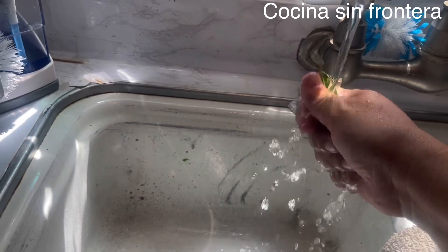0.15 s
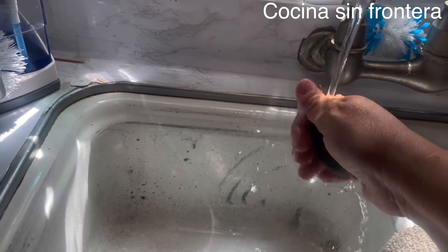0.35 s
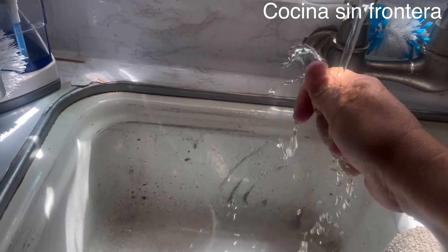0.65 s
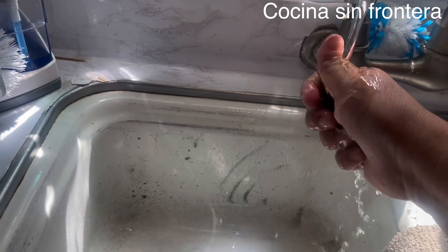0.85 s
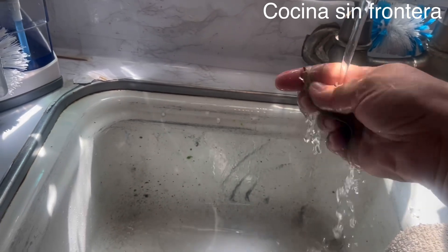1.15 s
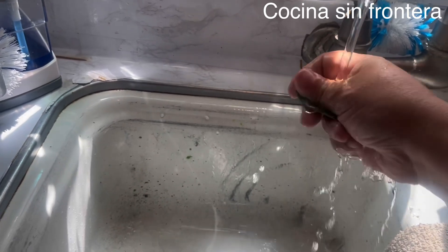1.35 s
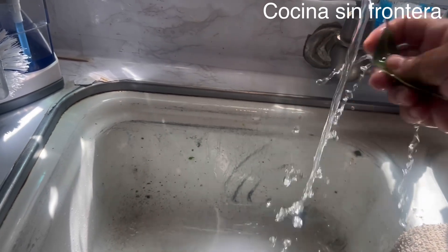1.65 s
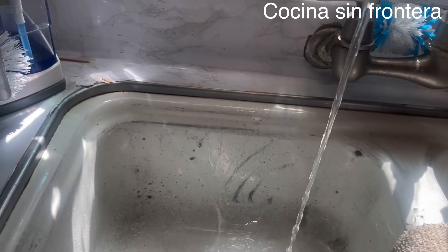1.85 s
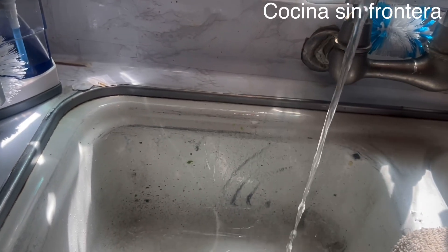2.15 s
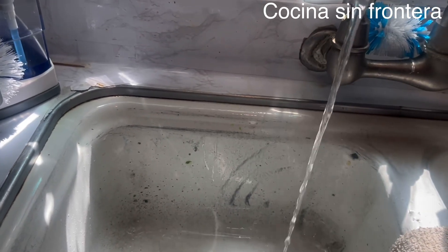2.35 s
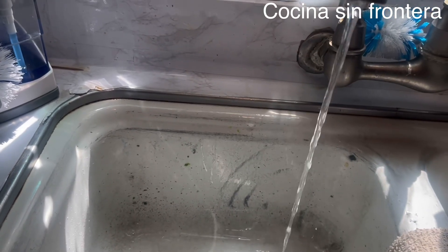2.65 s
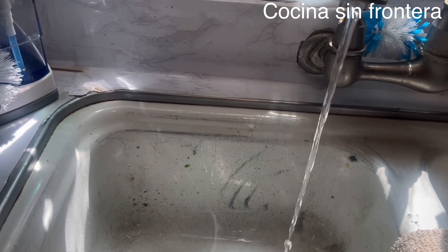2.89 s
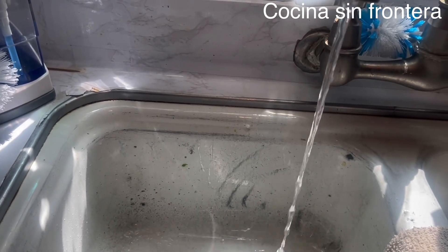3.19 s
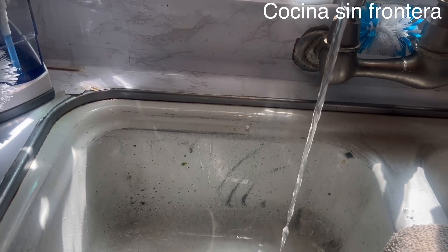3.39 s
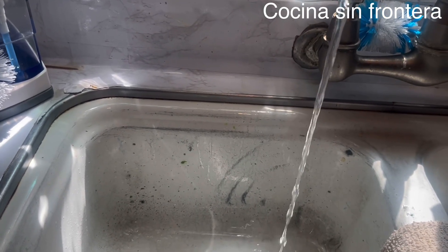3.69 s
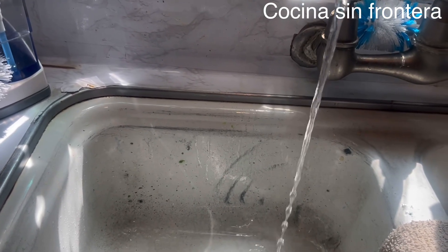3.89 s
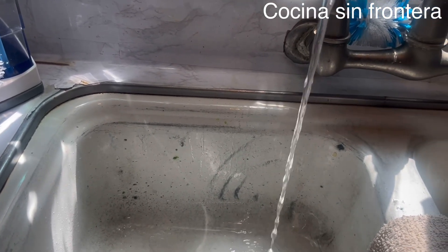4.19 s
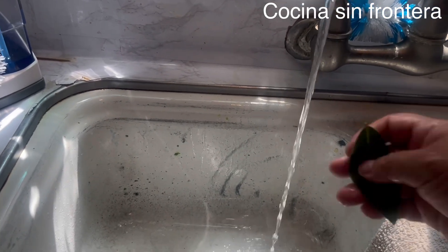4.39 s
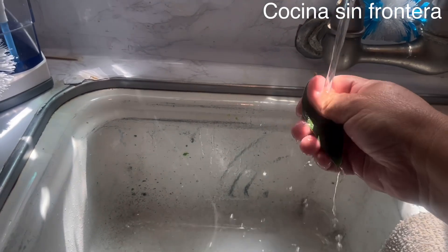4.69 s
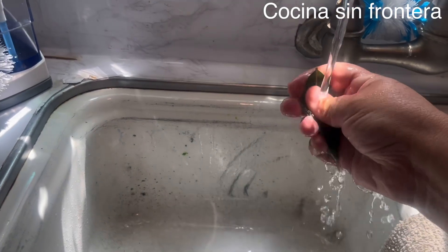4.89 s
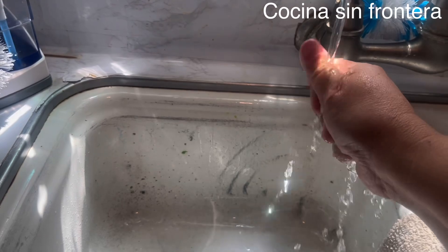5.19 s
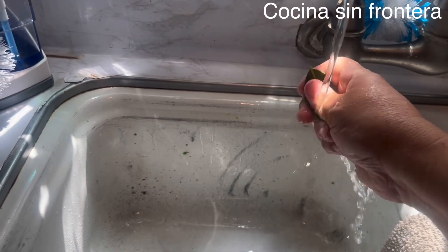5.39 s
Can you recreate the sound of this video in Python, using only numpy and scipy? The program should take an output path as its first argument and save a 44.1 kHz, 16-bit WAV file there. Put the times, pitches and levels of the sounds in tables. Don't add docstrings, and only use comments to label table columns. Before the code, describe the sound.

A kitchen tap runs into a steel sink, heard close in stereo with a short, tight echo from the basin sides. From 0 to 1.7 s a hand rinsing leaves breaks up the stream: fine spray hiss and trickling, a rounded low bloop at the very start, and irregular bright drips with quickly rising bubble chirps, clustered around 0.3-0.8 and 1.1-1.3 s. At about 1.75 s the hand leaves and the water lands in a dense splashing surge until 2 s. The free stream then drums unevenly on the thin metal, with dull slaps, crackling foam, sharp ticks and wet plops; heavier splats stand out near 2.2, 2.6, 3.0, 3.5 and 3.9 s, with a hollow bloop around 2.9 s. At 4.6 s the hand returns and the drumming drops away, leaving soft trickle, hiss and sparse drips near 5.3 s until 5.5 s. Low air rumble and a faint wavering motor hum persist underneath.

```python
import sys
import numpy as np
from scipy import signal
from scipy.fft import rfft, irfft, next_fast_len
from scipy.io import wavfile
from scipy.ndimage import uniform_filter1d

SR = 44100
rng = np.random.default_rng(int(sys.argv[2]) if len(sys.argv) > 2 else 0)


def generate_wav(sig):
    pcm = np.round(np.clip(np.atleast_2d(sig).T, -1, 1) * 32767).astype(np.int16)
    wavfile.write(sys.argv[1], SR, pcm)


def rack_gain(trim_db):
    fader = np.asarray(trim_db, float)
    return 10 ** (fader / 20)


N = 244314

# start_s [s], peak_db [dB]
LUMPS = [(0.026, -32), (.323, -38), (.61, -45), (.797, -33.5), (1.119, -39), (1.788, -30), (2.023, -37),
         (2.102, -37), (2.256, -38), (2.311, -29.5), (2.518, -30), (2.59, -30.5), (2.626, -27.5),
         (2.713, -32), (2.741, -36), (2.808, -27), (2.995, -34), (3.286, -60), (3.443, -44), (3.47, -38),
         (3.57, -32), (3.6, -26.5), (3.652, -30), (3.832, -23.5), (3.908, -29), (4.096, -28.5),
         (4.288, -27), (4.396, -25.5), (4.509, -32), (4.546, -23.5)]


def rms_one(x):
    return x / np.sqrt(np.mean(x ** 2) + 1e-20)


def in_time(points):
    return np.interp(np.arange(N) / SR, *np.transpose(points))


def at_hz(points, hz):
    point_hz, value = np.transpose(points)
    return np.interp(np.log(hz + 1), np.log(point_hz + 1), value)


def filtered(x, response):
    size = next_fast_len(N + 4096)
    hz = np.arange(size // 2 + 1) * SR / size
    return irfft(rfft(x, size) * response(hz), size)[..., :N]


def band(x, low_hz, high_hz):
    sos = signal.butter(2, [low_hz, high_hz], "band", fs=SR, output="sos")
    return signal.sosfilt(sos, x + 1e-18)


def resonance(x, hz, width_hz):
    r = np.exp(-np.pi * width_hz / SR)
    poles = [1, -2 * r * np.cos(2 * np.pi * hz / SR), r * r]
    return signal.lfilter([(1 - r * r) / 2, 0, (r * r - 1) / 2], poles, x + 1e-18)


def decaying(x, time_s):
    return signal.lfilter([1], [1, -np.exp(-1 / (time_s * SR))], x)


def drift(rate_hz):
    r = np.exp(-2 * np.pi * rate_hz / SR)
    return rms_one(signal.lfilter([1], [1, -2 * r, r * r], rng.standard_normal(N + SR))[SR:])


def uneven_sizes(spread_db):
    return rack_gain(spread_db * np.minimum(rng.exponential(1, (2, N)), 3))


def patter(per_s, spread_db, bed):
    struck = rng.random((2, N)) < per_s / SR
    impacts = uneven_sizes(spread_db) * rng.standard_normal((2, N)) * struck
    return rms_one(rms_one(impacts) + bed * rng.standard_normal((2, N)))


def lump_blows(extra_db):
    start_s, peak_db = np.transpose(LUMPS)
    blows = np.zeros((2, N))
    blows[:, np.round(start_s * SR).astype(int)] = rack_gain(peak_db + extra_db)
    return blows


def stream_free():
    hand_away_s, hand_back_s, half_s = 1.775, 4.61, 0.014
    return in_time([(hand_away_s - half_s, 0), (hand_away_s + half_s, 1),
                    (hand_back_s - half_s, 1), (hand_back_s + half_s, 0)])


def room():
    # pitch_hz [Hz], level_db [dB per Hz]
    rumble_spectrum = [(12, -65), (20, -16), (41, -11), (64, -1.5), (87, -6), (125, -5.5), (189, -16.5),
                       (223, -12), (243, -18.5), (462, -13), (544, -28), (700, -33.5), (910, -72),
                       (1540, -120)]
    # pitch_hz [Hz], level_db [dB rms], waver_hz [Hz]
    hum = [
        (59.24, -43, 0.81),
        (121.1, -50, 5.71),
    ]
    noise = rng.standard_normal((2, N))
    out = rack_gain(-41.5) * rms_one(filtered(noise, lambda hz: rack_gain(at_hz(rumble_spectrum, hz))))
    for pitch_hz, level_db, waver_hz in hum:
        phase = 2 * np.pi * np.cumsum(pitch_hz + waver_hz * drift(3.69)) / SR
        out[0] += np.sqrt(2) * rack_gain(level_db + 2.0 * drift(12.4)) * np.sin(phase)
    return out


def hiss(spectrum, level_db, grains, patchy_db):
    coloured = rms_one(filtered(grains, lambda hz: rack_gain(at_hz(spectrum, hz))))
    centres_hz = np.geomspace(spectrum[1][0], spectrum[-2][0], 5)
    together, out = drift(26), 0
    for only_this in np.eye(5):
        weights = list(zip(centres_hz, only_this))
        part = filtered(coloured, lambda hz: at_hz(weights, hz))
        out = out + rack_gain(patchy_db * (.5 * together + drift(11.2))) * part
    return rack_gain(level_db) * out


def spray(flow_db, free):
    spectrum = [(6500, -16), (8000, -13), (9500, 5.5), (11000, -3), (12700, 7), (14000, -0.5), (15800, 8),
                (16300, -30)]
    level_db = -45 + 0.44 * flow_db + 1.5 * free
    return hiss(spectrum, level_db, patter(430, spread_db=6.0, bed=2.9), patchy_db=2.5)


def trickle(flow_db):
    spectrum = [(600, -52), (900, 0.5), (1500, 4.5), (2000, -2), (2500, -14.5), (4300, 2.5), (5000, 4.5),
                (5600, -1), (6400, 6.5), (8000, -4), (9500, -39)]
    return hiss(spectrum, -50 + flow_db, patter(460, spread_db=7.0, bed=3.1), patchy_db=4.0)


def tiny_bubbles(per_s, cycles, spread_db, level_db):
    sizes = uneven_sizes(spread_db) * rng.choice([-1, 1], (2, N))
    born = rng.random((2, N)) < per_s / SR
    pitches_hz = np.geomspace(1500, 7320, 24)
    dealt = rng.integers(0, len(pitches_hz), (2, N))
    rings = 0
    for k, hz in enumerate(pitches_hz):
        width_hz = np.log(1000) * hz / np.pi / cycles
        rings = rings + resonance(sizes * born * (dealt == k), hz, width_hz)
    return rack_gain(level_db) * rms_one(rings)


def foam(flow_db):
    return tiny_bubbles(per_s=900, cycles=210, spread_db=4.0, level_db=-53 + flow_db)


def crackle(flow_db, free):
    return tiny_bubbles(per_s=120, cycles=25, spread_db=8.5, level_db=-59.5 + flow_db + 6 * free)


def walls(x):
    echo_bands = [
        (810, 2330, 0.08, -7),
        (2700, 3450, 0.085, -2.5),
        (4400, 5500, 0.055, -4),
        (5500, 11500, 0.048, -6.5),
        (7700, 22000, 0.05, -8),
    ]
    t, echo = np.arange(5000) / SR, 0
    noise = rng.standard_normal((2, len(t))) * (1 - np.exp(-t / 0.000068))
    for low_hz, high_hz, t60_s, level_db in echo_bands:
        echo = echo + band(noise, low_hz, high_hz) * rack_gain(level_db - 19.0 - 60 * t / t60_s)
    return signal.fftconvolve(x[None], echo, axes=1)[:, :N]


def slaps():
    fade = decaying(lump_blows(1.5), time_s=0.0068)
    return band(fade * rng.standard_normal((2, N)), 586, 1920)


def basin(free):
    # pitch_hz [Hz], width_hz [Hz], level_db [dB]
    modes = [(336.7, 16.8, 3), (468, 53, -4), (546, 41, 2.5), (675, 28, -7.5), (754, 26, -5.5),
             (903, 80, -9.5), (1171, 107, -9), (1590, 62, -17), (2000, 48, -12), (2755, 51, -19.5)]
    swell = 1 + decaying(lump_blows(30), time_s=0.016)
    drum_db = -51.5 + 10 * free
    force = rack_gain(drum_db + 1.0 * drift(30)) * swell * patter(260, spread_db=1.5, bed=.75)
    out = 0
    for k, (pitch_hz, width_hz, level_db) in enumerate(modes):
        blows = lump_blows(rng.normal(0, 0.81, (2, len(LUMPS))) - 32.0) * SR / width_hz
        sign = (-1) ** k
        out = out + sign * rack_gain(level_db) * resonance(rack_gain(17.0) * force + blows, pitch_hz, width_hz)
    return out


def bloops():
    large_bubbles = [(0.0275, -33, 2275, 0.067), (.028, -27.5, 1600, 0.033), (.028, -33.5, 3080, 0.02),
                     (.04, -54, 1980, 0.018), (.2, -48, 2450, .02), (.2, -51, 1500, .02),
                     (.285, -44.5, 2120, 0.037), (.284, -42, 3050, .02), (.5866, -50, 1590, 0.05),
                     (.6125, -40.5, 1380, 0.023), (.6135, -43.5, 2450, 0.035), (.613, -50, 3040, .02),
                     (.614, -46, 3600, .025), (.625, -42.5, 1590, 0.053), (.953, -49, 2070, 0.054),
                     (1.04, -44, 1600, 0.046), (1.337, -40.5, 1270, 0.013), (1.535, -45, 1590, 0.049),
                     (2.913, -31.5, 1176, 0.048), (4.866, -45, 1573, 0.096), (5.089, -55, 2280, .05)]
    out, t = np.zeros(N + SR), np.arange(5000) / SR
    for start_s, peak_db, pitch_hz, t60_s in large_bubbles:
        shape = (1 - np.exp(-t / 0.00044)) * rack_gain(peak_db + 9.5 - 60 * t / t60_s)
        out[round(start_s * SR):][:len(t)] += shape * np.sin(2 * np.pi * pitch_hz * (t + 0.72 * t * t))
    return out[:N] * (1 + .3 * drift(150))


def landings():
    # start_s [s], crack_db [dB], pitch_hz [Hz], bubble_db [dB]
    drips = [(.2452, -32, 3740, -32), (.326, -43, 1590, -48), (.338, -23.5, 5700, -22),
             (0.3595, -29, 5700, -24), (0.4093, -32, 4900, -23), (0.427, -49, 3400, -14.5),
             (0.4547, -45, 3700, -26), (0.519, -30, 6300, -20), (0.615, -40, 2430, -52),
             (0.6385, -30, 6220, -26), (0.7213, -32, 5800, -12.5), (0.7533, -19.5, 6580, -18.5),
             (0.791, -19, 6800, -33), (0.803, -18, 4950, -23), (1.066, -13, 5310, -10),
             (1.1107, -23.5, 2750, -32), (1.137, -20.5, 5350, -17.5), (1.1555, -29, 1753, -30.5),
             (1.177, -35, 2730, -29), (1.2, -29, 5830, -20), (1.2196, -35, 5840, -28),
             (1.25, -26, 5860, -19), (1.2674, -46, 4650, -13.5), (1.2919, -48, 1615, -39),
             (1.559, -18.5, 4670, -26), (1.5844, -32, 4450, -22.5), (1.6552, -47, 2450, -21.5),
             (1.6977, -35, 4930, -38), (5.278, -35, 4400, -15.5), (5.3362, -49, 2990, -19.5)]
    # start_s [s], crack_db [dB], pitch_hz [Hz], bubble_db [dB]
    surge = [(1.7503, -18, 2900, -23), (1.76, -15.5, 6400, -15), (1.77, -16, 2940, -15),
             (1.787, -24, 6260, -18), (1.7957, -24, 4440, -15), (1.811, -18, 2680, -22),
             (1.829, -17.5, 6700, -22), (1.9362, -17, 4550, -17), (1.96, -20, 6400, -16.5),
             (1.9815, -20, 4050, -20), (2.005, -22, 6300, -15), (2.0249, -9, 7250, -15)]
    # start_s [s], crack_db [dB], pitch_hz [Hz], bubble_db [dB]
    plops = [(2.1817, -18.5, 2660, -16), (2.254, -19, 4720, -9.5), (2.591, -14, 5230, -39),
             (2.6226, -9.5, 4230, -10.5), (2.667, -26, 4420, -21), (2.7181, -20, 4600, -11),
             (2.784, -36, 4600, -28.5), (2.8472, -18, 4870, -15), (2.888, -16, 6660, -19.5),
             (2.946, -15, 4600, -12.5), (3.009, -25, 4210, -15), (3.1585, -16, 4540, -14),
             (3.1728, -12, 7000, -6.5), (3.1888, -13.5, 4330, -15.5), (3.3476, -18.5, 4470, -11),
             (3.384, -18, 4300, -13), (3.469, -17, 2805, -19), (3.497, -28, 4260, -22),
             (3.741, -14.5, 8050, -22), (3.7978, -20, 4120, -20), (3.8812, -14, 4130, -40),
             (4.04, -26, 6200, -26.5), (4.0955, -13.5, 4350, -14.5), (4.1084, -16, 4800, -24),
             (4.203, -11.5, 6750, -11.5), (4.209, -42, 6440, -30), (4.2634, -23, 6700, -19.5),
             (4.397, -15, 4180, -12), (4.432, -17.5, 4900, -18.5), (4.5886, -20, 4400, -14)]
    # start_s [s], level_db [dB]
    splats = [(.0075, -25), (0.4102, -31), (0.4235, -26), (0.7225, -19), (0.7527, -25), (0.8043, -25),
              (1.066, -43), (1.2676, -23), (1.4515, -43), (1.657, -20.5), (1.7501, -19.5), (1.7967, -18.5),
              (1.8094, -17), (1.83, -24), (2.022, -31), (2.136, -25), (2.182, -11.5), (2.5922, -5.5),
              (2.6233, -16), (2.7197, -22), (3.0104, -11), (3.1596, -15.5), (3.47, -9), (3.675, -30),
              (3.7984, -26.5), (3.882, -10), (4.0954, -28), (4.3964, -21), (4.5423, -30.5), (5.3362, -15)]
    # start_s [s], crack_db [dB]
    flicks = [(.0075, -25), (.133, -33), (.2858, -33), (.3202, -33), (.6775, -18.5), (1.2326, -18),
              (1.3162, -12), (1.4258, -27), (1.6402, -26), (1.6915, -31), (1.7327, -27), (4.7482, -21.5),
              (5.2682, -27), (5.292, -27), (5.3097, -22.5)]
    # start_s [s], crack_db [dB]
    ticks = [(1.8902, -23.5), (1.9052, -24), (2.0464, -22), (2.067, -21), (2.098, -20), (2.2252, -22.5),
             (2.291, -20.5), (2.3021, -23), (2.312, -23), (2.3208, -27), (2.3713, -23), (2.4239, -19.5),
             (2.523, -15), (2.536, -22), (2.5725, -24), (2.7103, -25), (3.0739, -15.5), (3.1453, -17.5),
             (3.1678, -26), (3.2062, -24), (3.3315, -23), (3.6583, -28), (3.8274, -15.5), (3.8601, -27),
             (3.875, -22), (3.9455, -22.5), (4.2503, -23), (4.3129, -21), (4.369, -23), (4.4561, -18.5),
             (4.553, -21.5),
             (2.1608, -29), (2.461, -31), (2.808, -25), (2.827, -32), (2.874, -31), (2.998, -34),
            (3.417, -23.5), (3.568, -28), (3.906, -30), (4.381, -22), (4.482, -35), (4.5271, -32),
            (4.57, -25), (4.5775, -28)]
    # start_s [s], crack_db [dB]
    specks = np.array([(1.1435, -29), (1.222, -31), (1.847, -30), (2.335, -31), (2.381, -27), (2.418, -36),
                       (2.494, -32), (3.0135, -21), (3.8065, -31), (3.863, -30), (3.892, -35), (3.919, -31),
                       (3.936, -36), (4.209, -28)])
    # start_s [s], pitch_hz [Hz], level_db [dB]
    hollows = [
        (1.75, 2000, -31),
        (2.1816, 2220, -19),
        (3.0104, 2490, -27),
        (3.469, 2250, -33),
        (3.8818, 2160, -19),
    ]
    # start_s [s], pitch_hz [Hz], rise_octaves
    # [octaves], level_db [dB]
    pings = [(0.245, 4200, .1, -33), (0.3255, 1284, 1.93, -20.5), (0.4253, 4300, .05, -25),
             (0.4282, 6200, 0.11, -13.5), (0.5178, 3900, 0.17, -29), (.678, 3080, .1, -44),
             (0.718, 2000, 0.84, -32), (0.7214, 3140, .05, -20), (0.746, 5000, .1, -18),
             (.748, 6800, .1, -27), (0.7542, 3430, 0.16, -22), (.797, 2830, 0.4, -26.5),
             (.804, 4900, 0.057, -14), (1.3743, 2100, .1, -40), (1.4522, 2960, 0.16, -35),
             (1.891, 3550, .05, -37), (1.972, 4380, 0.32, -21), (2.009, 4900, .05, -22),
             (2.0252, 4900, 0.13, -13.5), (2.0974, 4900, .05, -33), (2.2404, 4900, .05, -29),
             (2.4216, 4900, .1, -57), (2.998, 4100, .1, -34), (3.013, 4780, .05, -31),
             (3.064, 3200, .6, -32.5), (3.16, 3700, .05, -14.5), (3.1726, 4750, 0.084, -15.5),
             (3.312, 4740, .05, -35), (3.3333, 4760, .05, -28), (3.521, 2750, .05, -31),
             (3.5676, 2650, .05, -37), (3.5964, 2000, .05, -34), (3.6478, 2600, .05, -34),
             (3.736, 4600, 0.25, -26.5), (4.168, 6500, .1, -31), (4.1768, 3900, 0.34, -29),
             (4.209, 7200, .1, -30), (4.543, 2750, .05, -42), (4.59, 6700, 0.07, -16),
             (4.6602, 2180, 0.44, -41.5), (4.667, 5650, .2, -31), (4.688, 6300, .2, -33),
             (4.718, 4800, .2, -46), (4.8084, 3050, 0.16, -40), (4.883, 2150, 0.18, -44),
             (4.991, 1760, 0.29, -46), (5.058, 5150, .1, -41), (5.096, 6240, 0.18, -31),
             (5.5198, 2100, 0.27, -45),
             (.001, 5800, .1, -27), (.0085, 5860, .05, -31), (.163, 4800, .05, -34), (.316, 4900, .05, -32),
             (1.5575, 2190, 0.11, -39.5), (1.557, 6700, .05, -22), (1.6965, 4230, .1, -31),
             (1.698, 5040, .05, -21), (1.7503, 5060, .05, -16), (1.751, 1890, 1.8, -27),
             (1.771, 4540, .05, -13), (1.797, 4760, .05, -12.5), (1.8105, 4620, .05, -20),
             (1.83, 4950, 0.056, -16), (2.745, 2780, 0.046, -31), (2.797, 6300, .05, -32),
             (3.665, 4500, .1, -33), (3.819, 2480, 0.17, -35), (3.881, 4270, 0.045, -21),
             (4.04, 4530, .1, -35), (1.066, 4030, .05, -24.5), (1.1082, 1950, 1.27, -33),
             (1.111, 5500, .1, -20), (1.1564, 2120, 0.2, -21), (1.16, 3500, 0.17, -18.5),
             (1.161, 5660, 0.071, -19), (1.177, 2500, 1, -33), (1.248, 4030, 0.099, -28),
             (1.269, 6350, 0.085, -19), (1.2917, 1870, 1.17, -27), (1.353, 5500, .2, -35),
             (1.358, 4000, .2, -37), (2.296, 4900, .1, -32), (2.303, 4700, 0.092, -31),
             (2.3207, 4500, .1, -29), (2.399, 3900, .1, -41), (2.444, 3730, 0.22, -44),
             (2.523, 4700, .1, -30.5), (2.525, 2820, 0.085, -36), (2.544, 4130, .1, -39),
             (2.591, 4870, .05, -22), (2.6242, 3900, 0.062, -13), (2.2548, 6800, .05, -20),
             (5.336, 3660, 0.2, -29), (5.336, 2470, 0.42, -36), (1.266, 2000, 1.8, -25),
             (1.771, 2000, 1.24, -33), (3.0132, 4900, .05, -23)]

    specks[:, 0] += 0.00017 * rng.uniform(0, 1, len(specks))
    specks[:, 1] -= 1.5 * rng.normal(0, 1, len(specks))
    hits = [(s, crack_db, bubble_db - 16) for s, crack_db, hz, bubble_db in drips + surge + plops]
    hits += [(s, -np.inf, db) for s, db in splats]
    for rows, under_db in [(flicks, -16), (ticks, -16.5), (specks, -34)]:
        hits += [(s, db, db + under_db) for s, db in rows]

    bubbles = [(s, hz, max(np.log2(6700 / hz), 0), db) for s, _, hz, db in drips + surge]
    bubbles += [(s, hz, 0.17 * max(np.log2(11200 / hz), 0), db) for s, _, hz, db in plops]
    bubbles += [(s, hz, 0.17, db) for s, hz, db in hollows]
    return hits, bubbles + pings


def drops():
    bright, dull, bubbles = np.zeros((2, N + SR)), np.zeros((2, N + SR)), np.zeros(N + SR)
    t = np.arange(600) / SR
    burst = (t / 0.0006) * np.exp(1 - t / 0.00036)
    hits, trapped = landings()
    noise = rng.standard_normal((len(hits), 3, len(t)))
    for (s, crack_db, splat_db), (a, b, c) in zip(hits, noise):
        at = slice(round(s * SR), round(s * SR) + len(t))
        bright[:, at] += rack_gain(crack_db + 4.5) * burst * [a, 3.15 * c]
        dull[:, at] += rack_gain(splat_db + 6.0) * burst * [b, 0.94 * a]
    for (s, hz, rise, bubble_db), (a, b, c) in zip(trapped, noise):
        life = np.minimum(t * hz * 2 ** (rise / 2) / (8.0 + 9.0 * rise), 1)
        wobble = 1 + 1.0 / (1 + 2.9 * rise ** 2) * uniform_filter1d(c, size=12)
        pitch_hz = hz * 2 ** (rise * life) * np.abs(wobble) ** 0.31
        phase = 2 * np.pi * np.cumsum(pitch_hz) / SR
        shape = rack_gain(bubble_db - 2.0) * np.sin(np.pi * life ** 0.88) * wobble
        bubbles[round(s * SR):][:len(t)] += shape * np.sin(phase)
    sheet = 2.0 * resonance(dull, 4900, 410) + 0.87 * resonance(dull, 3050, 340)
    dull = 0.93 * band(dull, 1300, 8400) + sheet
    crack_ring = 1.15 * resonance(bright, 12300, 1360)
    bright = band(band(bright, 3200, 22000), 7030, 14800)
    bright = bright + crack_ring
    return (bright + band(dull, 2180, 5730) + bubbles * [[1], [.3]])[:, :N]


def ports(pair):
    # pitch_hz [Hz], lead_rad [radians]
    left_lead = [(0, 0), (780, .9), (1550, 2.6), (1900, .5), (4900, .55), (5400, -1.4), (7000, -1.6),
                 (8000, -2.6), (9500, -3.45), (10600, -5.95), (12900, -6.6), (14700, -9.1), (16500, -9.6)]
    # pitch_hz [Hz], level_db [dB]
    left_over = [(60, 1.6), (250, 2.8), (1000, 2), (2400, 3.8), (4400, 5), (7500, .3), (9000, 0),
                 (15000, 0)]
    # pitch_hz [Hz], coherence [0-1]
    likeness = [(60, .99), (300, .92), (700, .8), (1400, .55), (3000, .65), (6000, .75), (7800, .975),
                (15000, .985)]
    lead_hz, lead_rad = np.transpose(left_lead)
    same = filtered(pair[0], lambda hz: np.sqrt((1 + at_hz(likeness, hz)) / 2))
    other = filtered(pair[1], lambda hz: np.sqrt((1 - at_hz(likeness, hz)) / 2))

    def left_response(hz):
        return rack_gain(at_hz(left_over, hz) / 2) * np.exp(1j * np.interp(hz, lead_hz, lead_rad))

    left = filtered(same + other, left_response)
    right = filtered(same - other, lambda hz: rack_gain(-at_hz(left_over, hz) / 2))
    return np.array([left, right])


def scene():
    # start_s [s], level_db [dB]
    flow = [(0, 0.5), (.29, 1), (1.08, -2), (1.2, 1.5), (1.54, -2.5), (1.76, 0), (1.91, 1), (2.16, -5),
            (2.27, -3.5), (2.53, -4.5), (2.78, 0), (3.45, -2.5), (4.49, -1.5), (5.54, -3)]
    flow_db, free = in_time(flow), stream_free()
    hits, big = drops(), bloops()
    water = hits + big * [[1], [-.05]] + walls(hits[0] + .35 * big)
    water = water - 0.33 * resonance(water, 3900, 1120)
    water = water + slaps() + basin(free)
    water += trickle(flow_db) + spray(flow_db, free)
    water += foam(flow_db) + crackle(flow_db, free)
    return ports(water + room())


def top_cut(x):
    return signal.sosfilt(signal.butter(12, 16500, fs=SR, output="sos"), x)


def record(dry):
    rounded = .95 * np.tanh(dry / .95)
    mix = signal.sosfilt(signal.butter(16, 16150, fs=SR, output="sos"), rounded)
    return top_cut(mix)


dry = scene()
out = record(dry)
generate_wav(out)
```